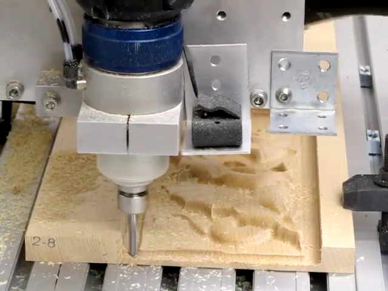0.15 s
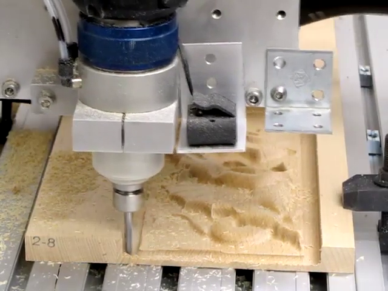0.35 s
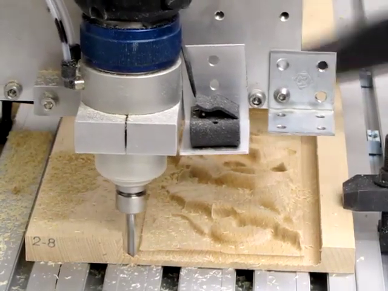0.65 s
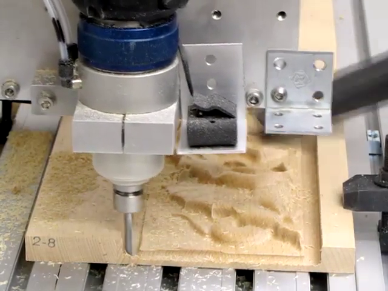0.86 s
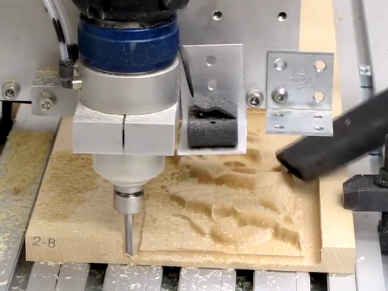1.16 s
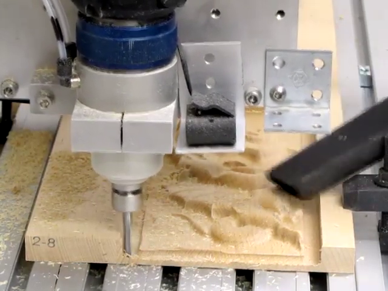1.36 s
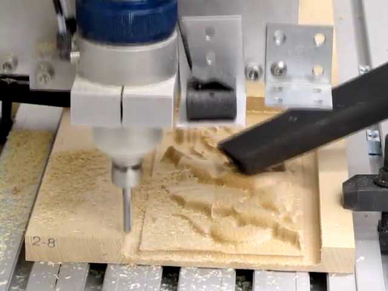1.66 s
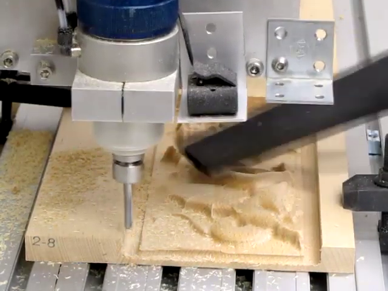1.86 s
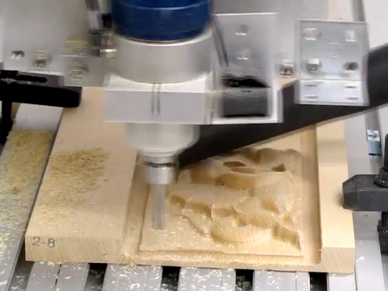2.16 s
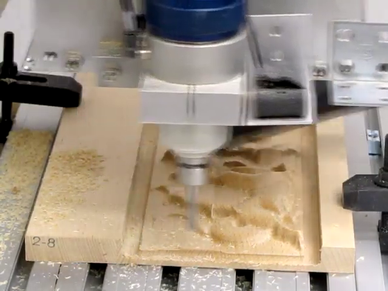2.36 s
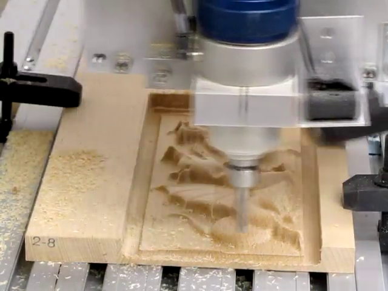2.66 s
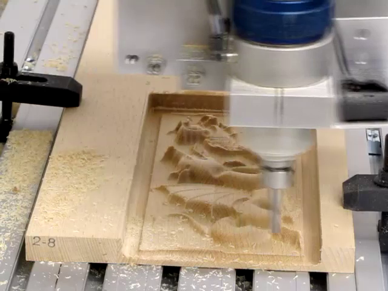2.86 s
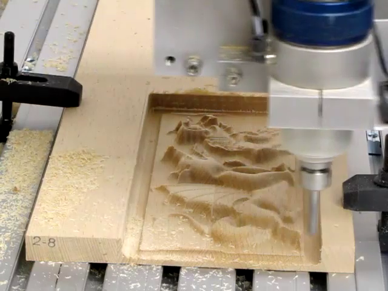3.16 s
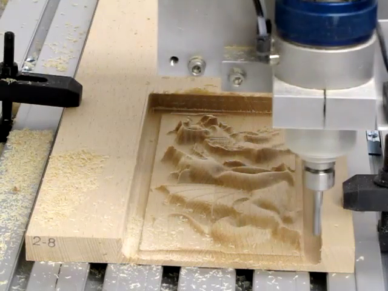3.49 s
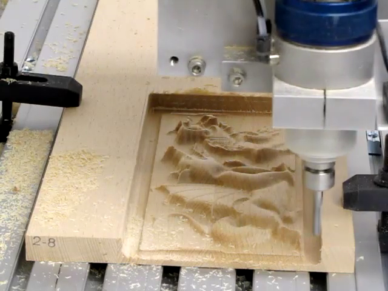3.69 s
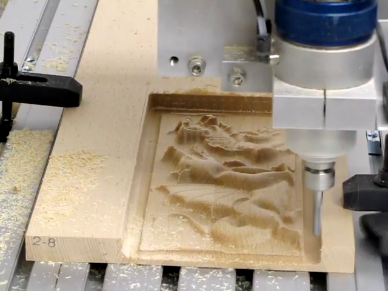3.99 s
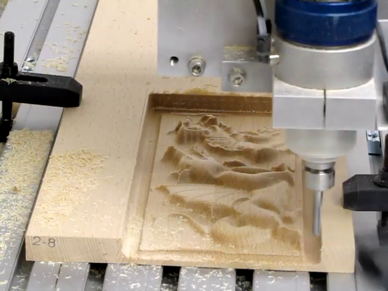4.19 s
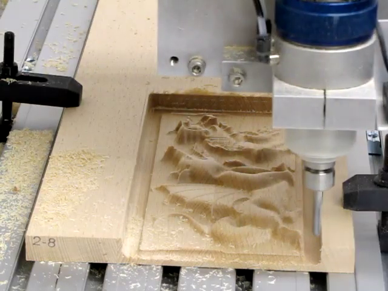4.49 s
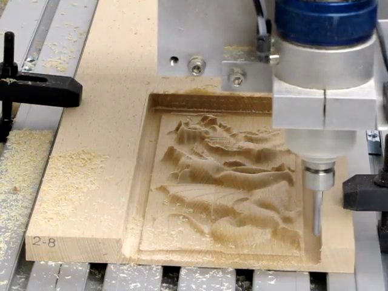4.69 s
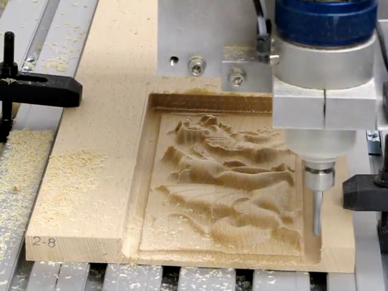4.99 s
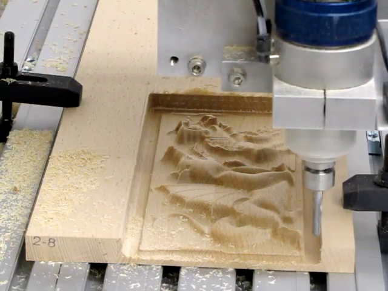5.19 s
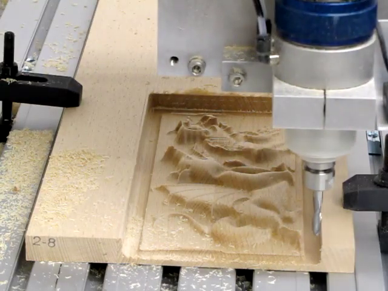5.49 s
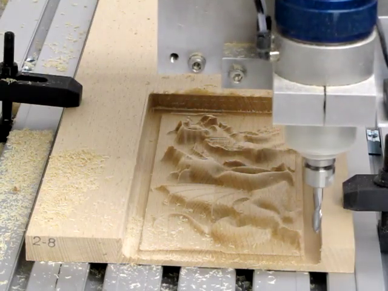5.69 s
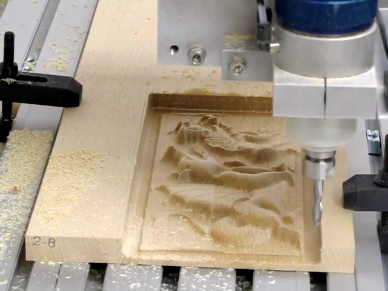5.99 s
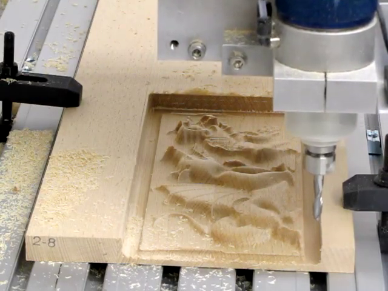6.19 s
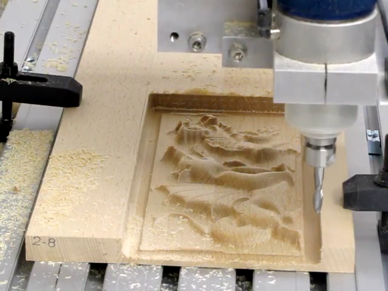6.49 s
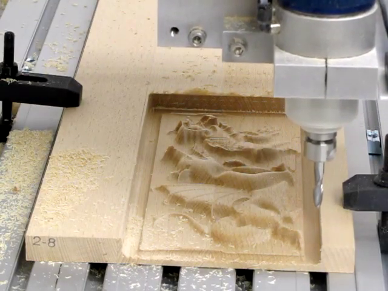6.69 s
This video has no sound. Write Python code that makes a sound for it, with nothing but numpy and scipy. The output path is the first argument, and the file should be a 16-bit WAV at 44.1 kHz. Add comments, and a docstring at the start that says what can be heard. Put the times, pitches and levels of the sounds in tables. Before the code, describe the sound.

A router spindle whines through wood, lifts and runs free, then fades out while a shop vacuum hisses and drones on.

```python
"""Router and shop vacuum

In a workshop, heard on a stereo pair: a router spindle finishes a cut in wood, lifts and travels aside while a
shop vacuum roars nearby. Shaft orders (multiples of its speed) and a ball-bearing whine stand over the air of
the hose; the nozzle gulps once as it seals. Then the scene cross-fades to another, where the vacuum drones
alone at a slightly lower pitch."""
import sys
import numpy as np
from scipy import signal
from scipy.io import wavfile
from scipy.ndimage import uniform_filter1d

SR = 44100
rng = np.random.default_rng(int(sys.argv[2]) if len(sys.argv) > 2 else 0)


def dump(signal):
    """Clip the signal to [-1, 1] and save it as 16-bit WAV at the path in sys.argv[1]."""
    limited = np.clip(np.atleast_2d(signal).T, -1, 1)
    pcm = np.round(limited * 32767).astype(np.int16)
    wavfile.write(sys.argv[1], SR, pcm)


N = 302085

# Each row: time in seconds, progress from both machines (0) to the vacuum alone (1).
HANDOVER = [(0, 0), (4.52, 0), (5.4, 1), (6.85, 1)]

# The vacuum's air in three bands: roar, rush, hiss. Each row: lower and upper edge in Hz.
FLOW_BANDS = [(450, 1200), (2400, 4000), (8700, 13000)]
# Each row: time in seconds, relative level of roar, rush and hiss in dB.
FLOW_LEVELS = [(0, -31.5, -28.5, -38.5), (1, -30.5, -28.5, -37), (1.9, -29, -28, -36.5),
               (2.4, -30, -27, -36), (3, -30.5, -29.5, -37), (3.45, -31.5, -27.5, -36),
               (3.9, -28.5, -25.5, -35), (4.1, -30.5, -25.5, -33.5), (4.35, -30.5, -30, -36),
               (5, -29, -25, -35.5), (5.65, -28.5, -24.5, -35.5), (6.85, -27, -23.5, -34)]
# Roar, rush and hiss in dB: the depth of their gusts, then their change as the nozzle seals.
GUST_DEPTH_DB = [0.72, 0.18, 0.55]
GULP_CHANGE_DB = [-4, 3.5, 8.5]
# Colour of the air beside the spindle. # Each row: frequency in Hz, relative level in dB.
AIR_SHAPE = [(30, -46), (65, -35), (115, -40), (135, -26), (230, -21.5), (310, -18), (450, -7), (750, -9.5),
             (1100, -2), (2100, -1.5), (3500, -4), (8000, -12.5), (13600, -23.5), (14300, -18),
             (14700, -33), (15600, -60)]
# The same columns for the vacuum alone.
AIR_SHAPE_ALONE = [(30, -44), (65, -30), (115, -27), (135, -21), (230, -13.5), (310, -11.5), (480, 1),
                   (750, -6), (1250, 1.5), (2100, -1.5), (3500, -2.5), (8000, -11), (14300, -25),
                   (15600, -32)]
# Resonances of housing and workshop. Each row: centre in Hz, width in Hz, boost in dB.
RESONANCES = [(136.5, 12.5, 7), (181, 20, 5.5), (255.3, 14, 10.5), (339, 18, 8.5), (624, 200, 4.5),
              (896, 87, 3), (3610, 120, 4), (6570, 150, 2)]
# Standing waves in the hose. Each row: frequency in Hz, ripple in dB before scaling by the handover.
HOSE_RIPPLE = [(300, -2.5), (800, 5.5), (1250, 7), (1800, 2.5), (3000, 2.5)]
# Brief flares in the air. Each row: peak time and length in seconds, centre and width in Hz, boost in dB.
AIR_FLARES = [(.58, 0.16, 3100, 150, 11), (1.483, 0.084, 3250, 500, 8.5), (3.9, 0.76, 604, 90, 5.5),
              (3.9, 0.53, 880, 170, 6), (4.2, 0.23, 2880, 300, 6), (4.21, .12, 15300, 1000, 22),
              (4.208, 0.11, 8660, 4000, 1.5)]
# Drifting patches in the air. Each row: frequency in Hz, depth in dB.
PATCH_DEPTH = [(300, 0.5), (3000, 1.5), (8000, 0.76), (13000, 1)]
# The air at the two microphones. Each row: frequency in Hz, coherence from 0 to 1.
AIR_COHERENCE = [(30, .93), (60, .98), (130, 1), (330, 0.98), (640, 0.94), (1400, 0.71), (2500, 0.48),
                 (5000, 0.18), (15000, 0.05)]
# Each row: frequency in Hz, pan in dB. Pan is always left level minus right.
AIR_PAN = [(130, 0), (400, 1), (700, -1), (1300, -1), (2400, -2), (4400, -.7), (15000, -.5)]
# Each row: time in seconds, lag of the air at the left microphone in microseconds.
AIR_LAG = [(0, 3), (2.5, 13), (4.5, 43), (6.85, 67)]

# Multiples of the vacuum motor's speed: rotation, fan blades, bearing, commutator.
VACUUM_ORDERS = [1, 6, 17.6, 22]
# The motor races when the nozzle seals; in the later scene, with the vacuum alone, it turns slower. Each row:
# time in seconds, speed in Hz.
VACUUM_SPEED = [(0, 374.7), (2.1, 374.5), (3.5, 374), (4.1, 374.4), (4.3, 376.6), (4.55, 375.5),
                (5.3, 374.3)]
VACUUM_SPEED_ALONE = [(4.5, 370.85), (5.6, 370.76), (6.85, 370.5)]
# Each row: time in seconds, level of each vacuum order in dB.
VACUUM_LEVELS = [(0, -35, -46, -38, -48), (1.5, -33.5, -41, -40, -50), (2.2, -31.5, -39, -47, -44),
                 (3, -31.5, -37, -43.5, -44), (3.65, -29.5, -34.5, -34, -48), (4.2, -33, -36, -45, -41),
                 (4.45, -29, -43, -49, -54)]
VACUUM_LEVELS_ALONE = [(5.4, -28, -27.5, -35.5, -37.5), (6.72, -26, -27, -33, -38)]
# Each row, one per order: pan in dB and left lead in radians beside the spindle, then the same alone.
VACUUM_STEREO = [(2, 0.14, .3, 0.26), (11, 0.76, -4, 0.53), (-1, 3.76, -5, -2.5), (8, 2.1, 2, -1.8)]

# The spindle's bearing. Each row: time in seconds, then level, pan and second upper sideband in dB.
BEARING_WHINE = [(0, -20, -1, -34.5), (.5, -20.5, 0.5, -29), (1.15, -20, 1, -34), (1.4, -18.5, 3, -34),
                 (1.65, -21, -3, -56.5), (2.3, -18.5, -1, -38), (2.55, -17, -1, -33),
                 (2.78, -19.5, -2.5, -29), (3.1, -22.5, -5, -35), (3.27, -21, -3.5, -35),
                 (3.5, -26, -9, -36), (3.65, -20.5, -7, -36), (3.88, -21, -7, -44), (4.05, -21.5, -3, -32),
                 (4.16, -26.5, -6, -31), (4.26, -33.5, -19, -39), (4.45, -30.5, -6, -42),
                 (4.65, -23, -2, -31), (5, -26.5, -6, -47), (5.28, -23.5, -3, -36), (5.39, -36, -1, -37.5)]
# Its faint sidebands. Each row: harmonic of the whine, multiples of shaft speed added.
SIDEBAND_ORDERS = [(1, -1), (1, 1), (1, 3), (2, 0), (3, 0), (6, 0), (7, 0), (9, 0)]
# Each row, one per sideband: level in dB, pan in dB, left lead in radians.
SIDEBAND_MIX = [(-44, -4, 0), (-42.5, -11, -0.73), (-44, -5, 0.37), (-41.5, 0, 0), (-44, 7, 0.11),
                (-64, -3, 0), (-54, 1, 0), (-63, -5, 0)]
# Each row: time in seconds, whine of the motor slots in dB, fifth harmonic of the bearing in dB.
HIGH_WHINES = [(0, -46, -41), (.35, -45, -42), (.7, -41, -43.5), (1, -48, -41), (1.45, -49, -43),
               (1.75, -35, -50), (2.05, -39, -48), (2.4, -42, -40), (2.75, -46, -46), (3.1, -41, -43),
               (3.4, -46, -46), (3.7, -40, -42), (3.88, -50, -35), (4.1, -46, -48), (4.75, -44, -43),
               (5.35, -49, -44)]

# The shaft races when the flutes leave the wood, then settles. Each row: time in seconds, speed in Hz.
SHAFT_SPEED = [(0, 344.7), (1.2, 344.3), (1.35, 344.45), (1.65, 347.2), (1.8, 346.75), (2.8, 346.35),
               (3.2, 345.95), (3.6, 346.35), (4.0, 345.55), (5.4, 345.55)]
# Each row: time in seconds, bite of the flutes in the wood from 0 to 1.
FLUTE_BITE = [(0, .7), (.25, 1), (1.35, 1), (1.5, 0), (6.85, 0)]
# Strong multiples of shaft speed; the last is the whine of the motor slots.
LOUD_ORDERS = [4, 5, 6, 12, 40]
# Each row, one per loud order: pan in dB, left lead in radians.
LOUD_STEREO = [(-1.5, .2), (-2.5, 0.45), (1.5, -1.65), (1, -1.4), (1, 1.5)]
# Chatter in the cut. Each row: time in seconds, fourth and sixth order in dB.
CUT_CHATTER = [(0, -29, -38), (.15, -30, -27), (.27, -28, -36), (.36, -22.5, -32), (.5, -26.5, -27),
               (.62, -27.5, -29), (.78, -36, -27), (.87, -26, -39), (1, -24, -33), (1.12, -32, -32),
               (1.22, -33, -39), (1.36, -32, -38), (1.44, -42, -44)]
# Swells as the spindle travels. Each row: time in seconds, fifth and twelfth order in dB.
TRAVEL_LEVELS = [(0, -29, -40), (.13, -23, -43), (.27, -36, -35), (.4, -29, -33), (.52, -35, -34),
                 (.65, -26, -44), (.85, -36, -38), (1, -24.5, -39), (1.15, -27, -43), (1.35, -52, -34),
                 (1.6, -36, -39), (2.2, -30, -44), (2.65, -27, -39), (3.1, -33, -34.5), (3.6, -31, -33.5),
                 (4.2, -36, -36), (4.8, -31.5, -37.5), (5.35, -39, -47)]
# Weak multiples of shaft speed.
FAINT_ORDERS = [2, 3, 7, 8, 9, 10, 11, 13.84, 14, 18, 20.25, 24.66]
# Each row, one per faint order: level cutting, level running free and pan in dB, left lead in radians.
FAINT_MIX = [(-34, -60, -2, 1.54), (-40.5, -42, -4, 0.5), (-47, -47, -8, -0.5), (-40.5, -46.5, -14, 1),
             (-47, -51.5, 7, 5), (-42, -48, 8, 1.5), (-47, -41, 0, 8), (-43, -49.5, -1, 2.5),
             (-45, -57, -3, 1.5), (-46, -44, -7, 2), (-55, -57, 0, 2), (-60, -59, -12, 16)]

GULP_S, GULP_RISE_S, GULP_HOLD_S, GULP_FALL_S = 4.05, .17, 0.029, 0.028
HOSE_SPACING_HZ, TOP_HZ = 77.7, 15650
BEAT_S = 4.885  # the vacuum's faster and slower hums nearly cancel here
BALL_PASSES_PER_TURN = 4.585
FREE_FOURTH_DB, FREE_SIXTH_DB, LIFT_S = -42.5, -55, .05


def gain_of(db):
    """Decibels to an amplitude factor."""
    return np.exp(np.asarray(db) * (np.log(10) / 20))


def unit_rms(x):
    """Scales to rms 1."""
    return x / np.sqrt(np.mean(x ** 2) + 1e-20)


def over_frequency(points, hz):
    """Joins (Hz, value) points on a log-frequency axis."""
    f, value = np.transpose(points)
    return np.interp(np.log(hz + 1), np.log(f + 1), value)


def curves(rows, t=np.arange(N) / SR):
    """Joins each column of (seconds, value, ..) rows in time."""
    times, *columns = np.transpose(rows)
    return [np.interp(t, times, column) for column in columns]


def drift(fastest_hz):
    """A slow random wander of rms 1."""
    t = np.arange(0, N + 256, 256) / SR
    rates = np.geomspace(.8, fastest_hz, num=16)
    slow = sum(np.sin(2 * np.pi * (f * t + rng.random())) / np.sqrt(f) for f in rates)
    return np.interp(np.arange(N) / SR, t, unit_rms(slow))


def tone(hz, db, pan_db, lead_rad, waver_db, wobble_rad, start_turns=None):
    """A sine at both microphones; reflections make level and phase wander, the level apart in each."""
    if start_turns is None:
        start_turns = rng.random()
    phase = 2 * np.pi * (np.cumsum(hz) / SR + start_turns) + wobble_rad * drift(20)
    shared_db = db + waver_db * drift(16)
    return np.array([np.sqrt(2) * gain_of(shared_db + side * pan_db / 2 + 0.46 * waver_db * drift(6.7))
                     * np.sin(phase + side * lead_rad / 2) for side in (1, -1)])


def airflow_db(t):
    """Levels of roar, rush and hiss: they gust, and as the nozzle seals the roar drops, the rest jump."""
    rise = (t - GULP_S) / GULP_RISE_S
    fall = 1 - (t - GULP_S - GULP_RISE_S - GULP_HOLD_S) / GULP_FALL_S
    gulp = np.clip(np.minimum(rise, fall), 0, 1)
    gusts = np.array([db * np.interp(t, np.arange(N) / SR, drift(12)) for db in GUST_DEPTH_DB])
    return np.array(curves(FLOW_LEVELS, t)) + np.outer(GULP_CHANGE_DB, gulp) + gusts


def air_spectrum_db(hz, t):
    """Housing and hose colour the flow; the standing waves deepen once the vacuum is alone."""
    alone, = curves(HANDOVER, t)
    shape_db = np.outer(over_frequency(AIR_SHAPE, hz), 1 - alone)
    shape_db += np.outer(over_frequency(AIR_SHAPE_ALONE, hz), alone)
    shape_db += sum(db / (1 + (2 * (hz - f) / width) ** 2) for f, width, db in RESONANCES)[:, None]
    ripple = over_frequency(HOSE_RIPPLE, hz) * np.cos(2 * np.pi * hz / HOSE_SPACING_HZ)
    shape_db += np.outer(ripple, 0.19 + 0.84 * alone)
    # each band is brought to its level, with a smooth slope between the bands
    power = gain_of(shape_db) ** 2
    band_db = [10 * np.log10(power[(hz > low) & (hz < high)].sum(0)) for low, high in FLOW_BANDS]
    band_index = over_frequency([(800, 0), (3000, 1), (10000, 2)], hz)
    band_weights = np.clip(1 - abs(band_index[:, None] - np.arange(3)), 0, 1)
    shape_db += band_weights @ (airflow_db(t) - band_db)
    flare_db = sum(db * np.exp(-np.add.outer((2 * (hz - f) / width) ** 2, (2 * (t - at) / length) ** 2))
                   for at, length, f, width, db in AIR_FLARES)
    return shape_db + flare_db


def vacuum_air():
    """Turbulent flow in the hose: alike at both microphones in the bass, diffuse in the treble."""
    frames, hz = N // 512 + 5, np.fft.rfftfreq(2048, 1 / SR)
    t = np.arange(frames) * 512 / SR
    level_db = air_spectrum_db(hz, t)
    left_re, left_im, diffuse_re, diffuse_im, patches = rng.standard_normal((frames, len(hz), 5)).T
    patches = unit_rms(uniform_filter1d(uniform_filter1d(patches, 20, axis=0), 6, axis=1))
    level_db += over_frequency(PATCH_DEPTH, hz)[:, None] * patches
    left, diffuse = left_re + 1j * left_im, diffuse_re + 1j * diffuse_im
    coherence = over_frequency(AIR_COHERENCE, hz)[:, None]
    lag_us, = curves(AIR_LAG, t)
    advance = np.exp(2j * np.pi * np.outer(hz, lag_us) / 1e6)
    right = coherence * left * advance + np.sqrt(1 - coherence ** 2) * diffuse
    pan = gain_of(over_frequency(AIR_PAN, hz) / 2)[:, None]
    spectra = np.array([left * pan, right / pan]) * gain_of(level_db)
    return gain_of(2.0) * signal.istft(spectra, nperseg=2048, noverlap=1536)[1][:, :N]


def vacuum_motor(speed, levels, stereo_columns, turns_at_beat):
    """The nearby vacuum's motor hums in orders of its speed; the higher ones flutter more."""
    hz, = curves(speed)
    start = turns_at_beat - hz[:round(BEAT_S * SR)].sum() / SR
    return sum(tone(k * hz, db, *stereo[stereo_columns], waver_db=0.11 * k, wobble_rad=0.034 * k,
                    start_turns=k * start)
               for k, stereo, db in zip(VACUUM_ORDERS, VACUUM_STEREO, curves(levels)))


def spindle_bearing(shaft_hz, fifth_db):
    """Balls passing a flaw in the race whine; each shaft turn splits off sidebands."""
    ball_hz = BALL_PASSES_PER_TURN * shaft_hz
    level_db, pan_db, upper_db = curves(BEARING_WHINE)
    whine = tone(ball_hz, level_db, pan_db, lead_rad=0, waver_db=0.96, wobble_rad=0.13)
    whine += tone(5 * ball_hz, fifth_db, pan_db=0, lead_rad=.2, waver_db=3.2, wobble_rad=0.6)
    whine += tone(ball_hz + 2 * shaft_hz, upper_db, pan_db=-2.1, lead_rad=.3, waver_db=1, wobble_rad=.3)
    sidebands = sum(tone(h * ball_hz + k * shaft_hz, *mix, waver_db=-0.2, wobble_rad=0.86 + 0.17 * h)
                    for (h, k), mix in zip(SIDEBAND_ORDERS, SIDEBAND_MIX))
    return whine + sidebands


def router_spindle():
    """Orders of the shaft and its bearing's whine; the cut slows the shaft and wakes the low orders."""
    shaft_hz, = curves(SHAFT_SPEED)
    bite, = curves(FLUTE_BITE)
    fourth_db, sixth_db = curves(CUT_CHATTER)
    fifth_db, twelfth_db = curves(TRAVEL_LEVELS)
    slots_db, bearing_fifth_db = curves(HIGH_WHINES)
    cut_end_s = CUT_CHATTER[-1][0]
    lifted = np.clip((np.arange(N) / SR - cut_end_s) / LIFT_S, 0, 1)
    fourth_db += lifted * (FREE_FOURTH_DB - fourth_db)
    sixth_db += lifted * (FREE_SIXTH_DB - sixth_db)
    loud_db = [fourth_db, fifth_db, sixth_db, twelfth_db, slots_db]
    loud = sum(tone(k * shaft_hz, db, *stereo, waver_db=1.46 + .04 * k, wobble_rad=0.11 + 0.018 * k)
               for k, db, stereo in zip(LOUD_ORDERS, loud_db, LOUD_STEREO))
    faint = sum(tone(k * shaft_hz, bite * cut_db + (1 - bite) * free_db, *stereo,
                     waver_db=1.7, wobble_rad=0.48)
                for k, (cut_db, free_db, *stereo) in zip(FAINT_ORDERS, FAINT_MIX))
    return loud + faint + spindle_bearing(shaft_hz, bearing_fifth_db)


def scene():
    """Both machines cross-fade into the vacuum alone; its faster and slower hums beat meanwhile."""
    fade = np.pi / 2 * curves(HANDOVER)[0]
    leaving, arriving = np.clip(np.cos(fade) - 1e-9, 0, 1), np.sin(fade)
    faster_hum = vacuum_motor(VACUUM_SPEED, VACUUM_LEVELS, slice(0, 2), turns_at_beat=0)
    slower_hum = vacuum_motor(VACUUM_SPEED_ALONE, VACUUM_LEVELS_ALONE, slice(2, 4), turns_at_beat=0.57)
    hum = leaving ** .6 * faster_hum + arriving ** 0.59 * slower_hum
    spindle = leaving ** 0.27 * router_spindle()  # drops out at the very end of the fade
    return vacuum_air() + hum + spindle


def record(dry):
    """A steep low-pass on both microphones takes off the highest treble."""
    lowpass = signal.firwin(511, TOP_HZ, window=("kaiser", 9), fs=SR)
    return signal.oaconvolve(dry, lowpass[None], "same")


dry = scene()
out = record(dry)
dump(out)
```